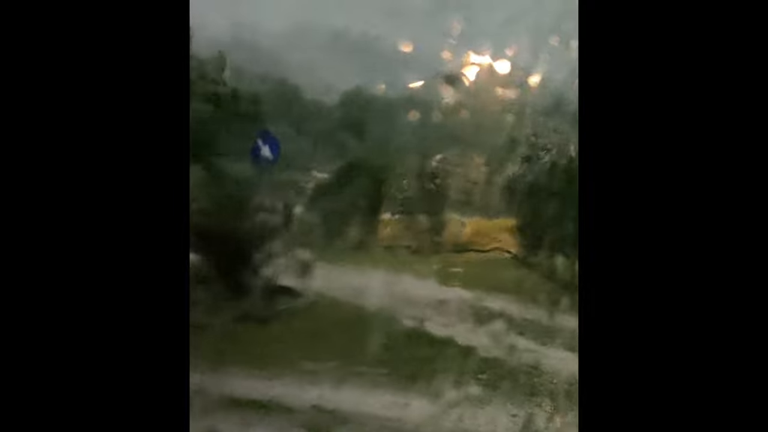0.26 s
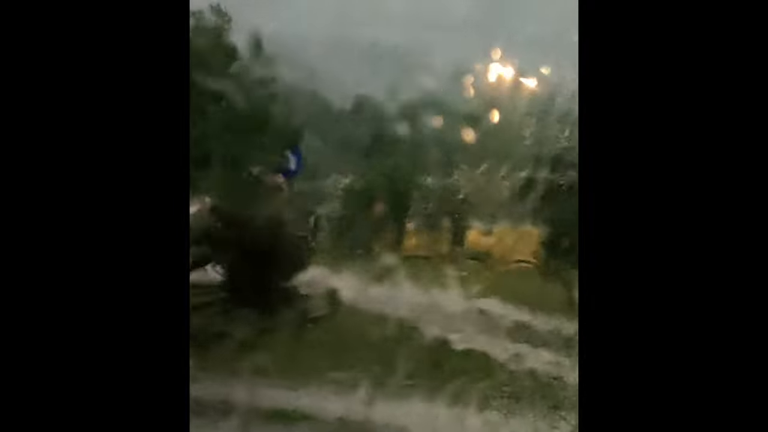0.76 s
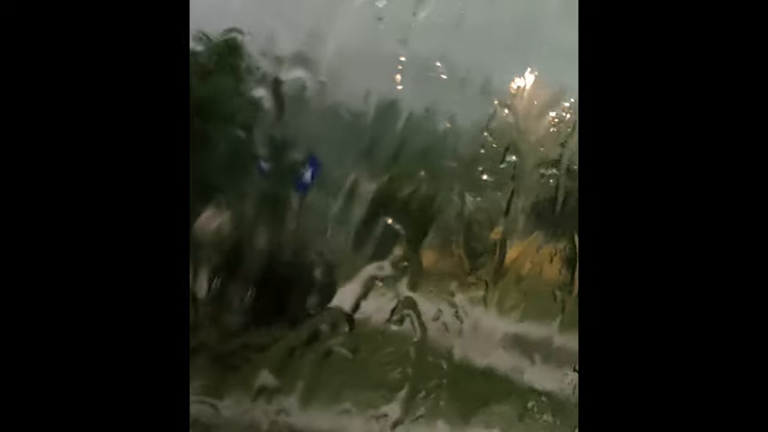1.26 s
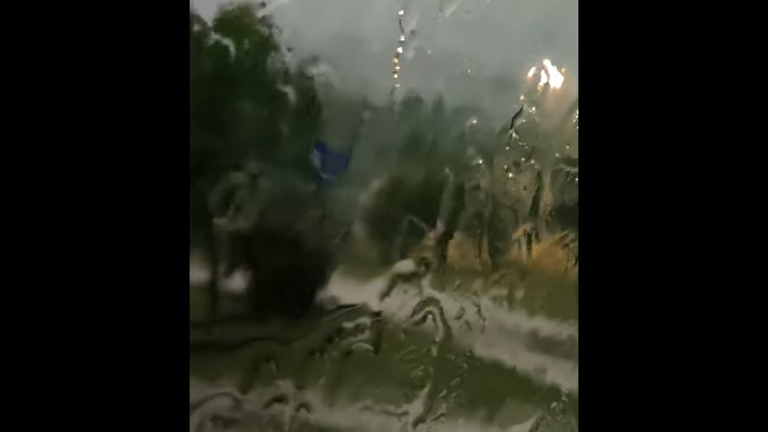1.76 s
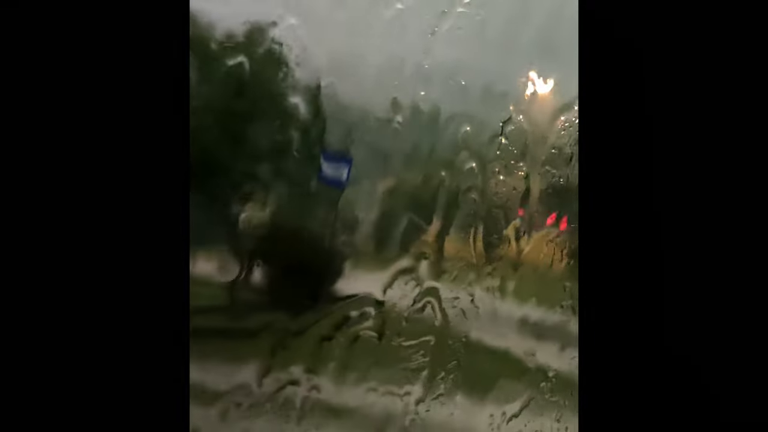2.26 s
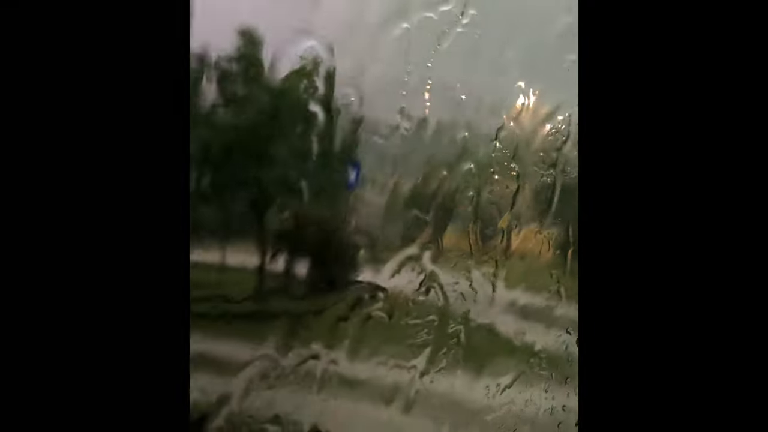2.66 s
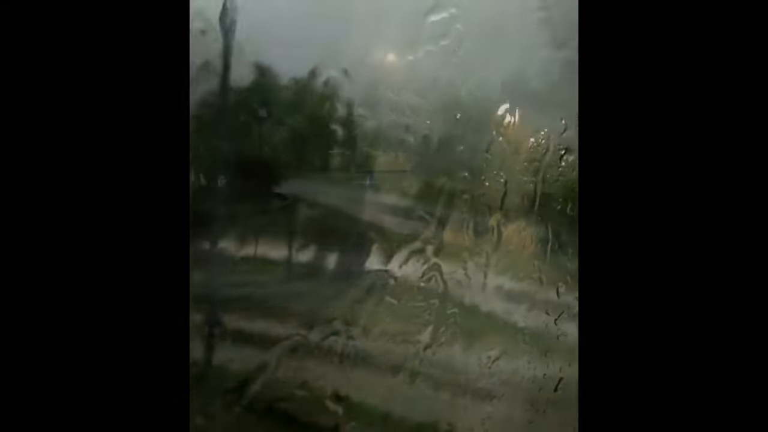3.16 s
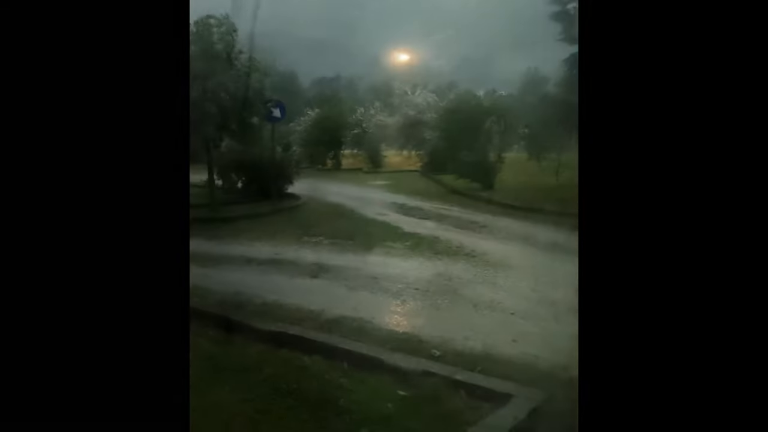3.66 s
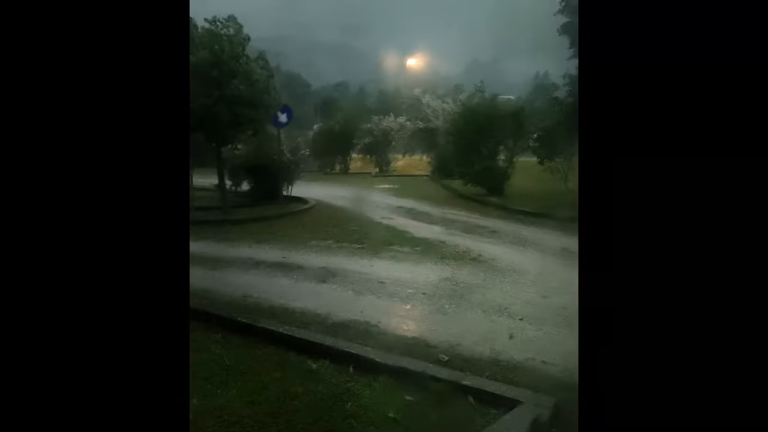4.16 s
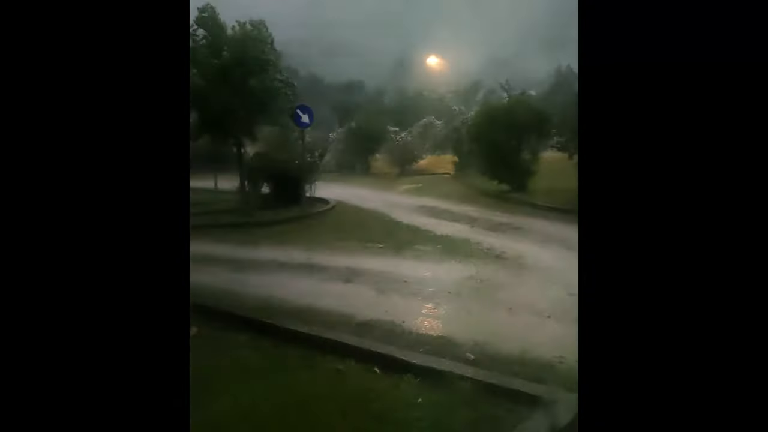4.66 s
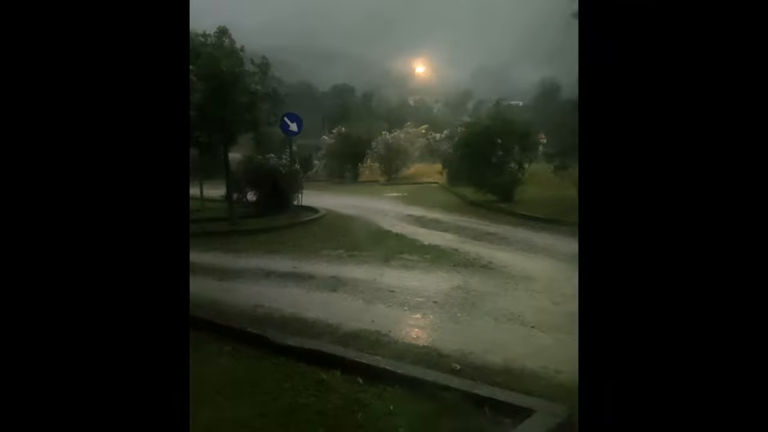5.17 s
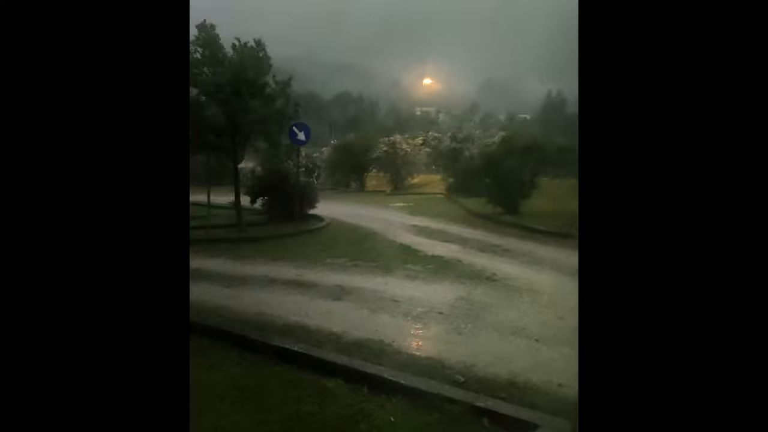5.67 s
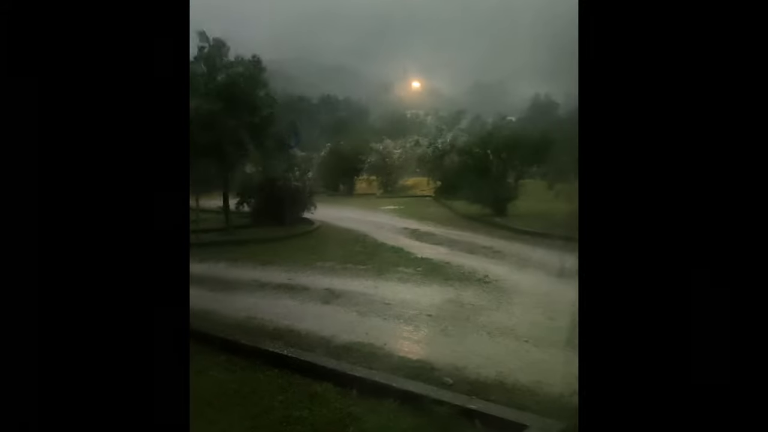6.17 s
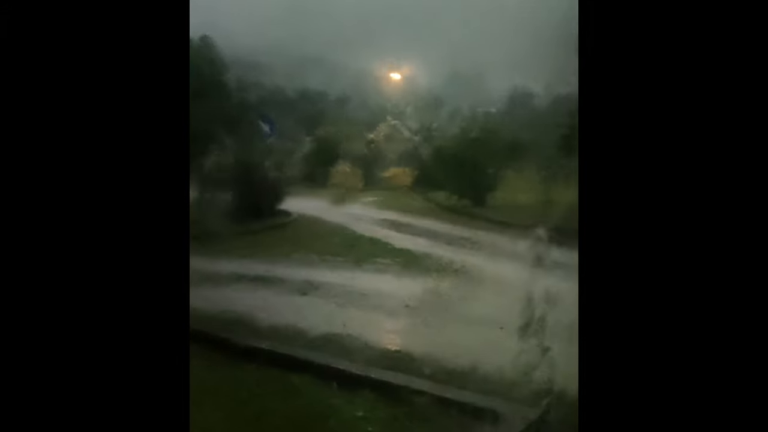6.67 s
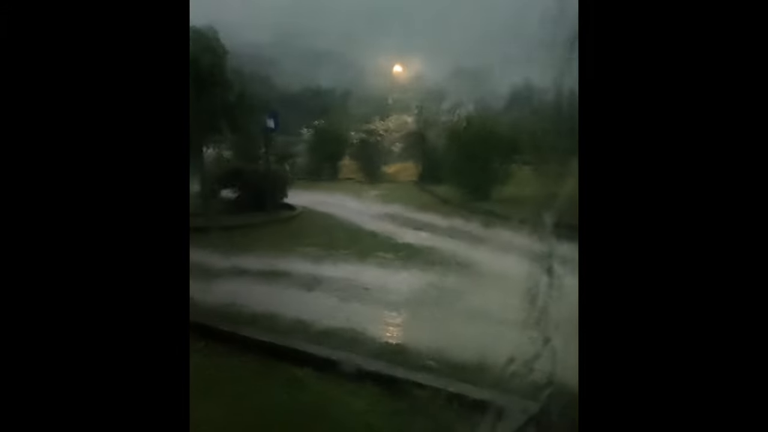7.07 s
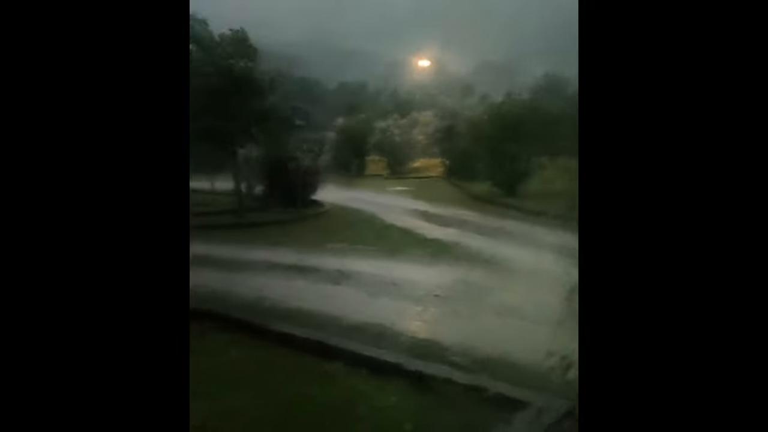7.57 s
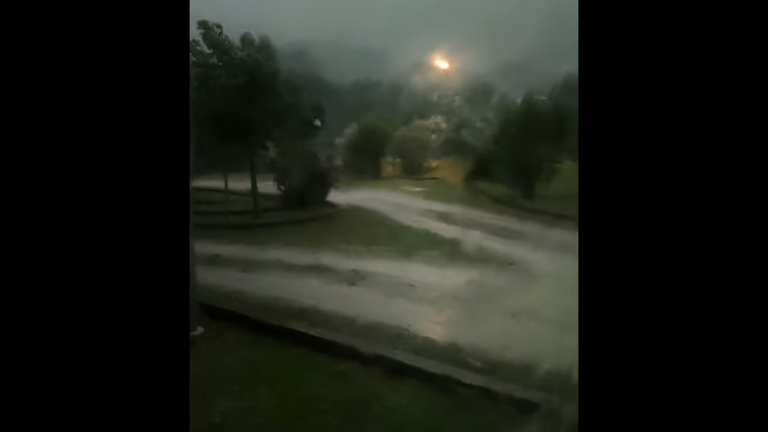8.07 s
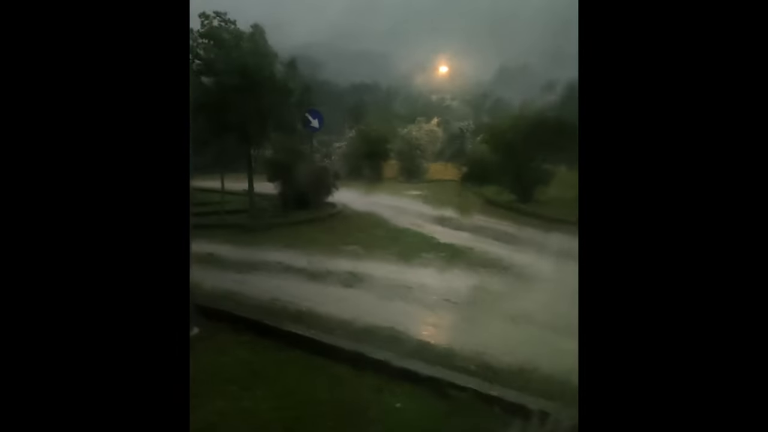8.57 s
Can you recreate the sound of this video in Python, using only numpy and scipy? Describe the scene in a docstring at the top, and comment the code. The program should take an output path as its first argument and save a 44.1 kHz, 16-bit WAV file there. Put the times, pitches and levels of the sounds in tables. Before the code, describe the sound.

Close rain patter and spray on a window with low roof thumps and wind rumble, a momentary silence, a quieter stretch, then violent splashing bursts.

```python
"""Heavy rain inside a closed shelter

Gusts of rain beat on the glass and roof, heard from inside by a microphone with two close ports.
Behind a steady wash from outside, wind noise buffets the walls and clumped impacts drum low on the roof;
thumps ring the air and panels. Nearest the ear, drops patter, spray and fizz on the pane, as filtered ticks
and rustle, and big splats ring it. The sound cuts out for a moment and fades back in."""
import sys
import numpy as np
from scipy import signal
from scipy.fft import rfft, irfft, next_fast_len
from scipy.io import wavfile
from scipy.ndimage import uniform_filter1d

SR = 44100
rng = np.random.default_rng(int(sys.argv[2]) if len(sys.argv) > 2 else 0)


def pcm_store(signal):
    """Save signal as 16-bit PCM."""
    levels = np.round(np.clip(np.atleast_2d(signal), -1, 1) * 32767)
    wavfile.write(sys.argv[1], SR, levels.astype(np.int16).T)


N = 388521  # length in samples


def gain_of(db):
    """Decibels to amplitude gain."""
    return 10 ** (np.asarray(db) / 20)


def sides(db):
    """A left-right difference in dB, shared equally as gains of the two ports."""
    return gain_of(np.multiply(db, [[.5], [-.5]]))


def evened(x):
    """Scaled to an rms of 1."""
    return x / np.sqrt(np.mean(x ** 2) + 1e-20)


def over_time(points):
    """A table of times and values, joined by straight lines."""
    return np.interp(np.arange(N) / SR, *np.transpose(points))


def over_pitch(points, hz):
    """A table read on a log-frequency axis."""
    f, value = np.transpose(points)
    return np.interp(np.log(hz + 1), np.log(f + 1), value)


def smoothed(x, width, axis=-1):
    """Two running means in a row."""
    return uniform_filter1d(uniform_filter1d(x, width, axis), width, axis)


def uneven(db, per_s):
    """A random wander of the level, in dB."""
    return db * evened(smoothed(rng.standard_normal(N), int(SR / per_s / 2)))


def convolved(x, taps):
    """Both ports through one impulse response."""
    return signal.oaconvolve(x, taps[None], axes=1)[:, :N]


def coloured(x, spectrum):
    """Causal filter of unit energy: its phase is the Hilbert transform of the log gain."""
    hz = abs(np.fft.fftfreq(8192, 1 / SR))
    log_gain = np.log(gain_of(np.maximum(over_pitch(spectrum, hz), -100)))
    taps = np.fft.ifft(np.exp(np.conj(signal.hilbert(log_gain)))).real[:4096]
    return convolved(x, taps / np.linalg.norm(taps))


def drops(per_s, spread_db, t60, clump_db, clump_s, tick, count=1):
    """Random impacts, in clumps: a sharp tick, then a dying rustle unlike at the two ports."""
    hit = rng.random(N) < per_s / SR
    size = np.minimum(rng.exponential(1, N), 5)
    clump = evened(smoothed(rng.standard_normal(N), max(int(clump_s * SR), 1)))
    train = hit * gain_of(spread_db * size + clump_db * clump)
    decay = gain_of(-120 / (t60 * SR))  # power kept from sample to sample
    envelope = np.sqrt(signal.lfilter([1], [1, -decay], train ** 2))
    # each of the count parts that a drop excites moves in its own way under the same envelope
    ticks = evened(train) * rng.choice([-1., 1.], (count, 2, N))
    rustle = evened(envelope) * rng.standard_normal((count, 2, N))
    return evened(rustle + tick * ticks)


DECAY_DB_PER_DB = -0.1248  # dB of decay time per dB of blow above -30: bigger blows die sooner


def bursts(rows, rise_s, t60, pan_db, tick):
    """Blows, one signal per dB column: a first contact, then a rustle that rises and dies, on a random side."""
    t = np.arange(SR // 2) / SR
    envelope, contact = np.zeros((2, len(rows[0]) - 1, 2, N + SR))
    for (s, *db), side in zip(rows, rng.standard_normal((len(rows), 1))):
        at = round(s * SR)
        size = gain_of(db)[:, None, None] * sides(pan_db * side)
        decay_s = np.reshape(t60 * gain_of(DECAY_DB_PER_DB * (np.array(db) + 30)), (-1, 1, 1))
        envelope[:, :, at:at + len(t)] += size * (1 - np.exp(-t / rise_s)) * gain_of(-60 * t / decay_s)
        contact[:, :, at:at + 1] += tick * size
    return (envelope * rng.standard_normal(envelope.shape) + contact)[:, :, :N]


# likeness of the two microphone ports: pitch_hz, likeness (0 to 1)
SAME = [(60, 0.97), (200, 0.94), (350, 0.7), (500, 0.59), (750, 0.051), (1250, 0.49), (1700, 0.24),
        (2200, 0.16), (3200, 0.03), (6000, 0.24), (15000, .05)]
# balance of the two ports: pitch_hz, left_right_db
TILT = [(60, -1), (130, 0.5), (290, -1), (640, 1), (1410, 1), (3100, 1.5), (6820, -0.5), (15000, 2.5)]


def ports(x, lag_s):
    """Close microphone ports hear long waves alike, the right one a little late."""
    size = next_fast_len(N)
    hz = np.fft.rfftfreq(size, 1 / SR)
    left, right = rfft(x, size)
    same, tilt = np.clip(over_pitch(SAME, hz), 0, 1), gain_of(over_pitch(TILT, hz) / 2)
    shared = same * left * np.exp(-2j * np.pi * hz * lag_s)
    own = np.sqrt(1 - same ** 2) * right
    return irfft(np.array([left * tilt, (shared + own) / tilt]), size)[:, :N]


# colour of the steady rain outside, through the glass: pitch_hz, relative_level_db (per Hz)
WASH = [(300, -20), (500, 8), (700, -2.5), (1100, 3), (1500, -23), (2300, -7), (2900, 2), (3280, 7.5),
        (3600, 0), (4100, 0), (5000, -11.5), (6200, -8.5), (7200, -33), (8200, -36.5), (12000, -62)]


def far_wash():
    """Countless drops outside the shelter merge into steady noise, heard through the glass."""
    return coloured(rng.standard_normal((2, N)) * gain_of(-52), WASH)


BUFFET_DB, BUFFETS_PER_S = 2.5, 26  # unevenness of the wind and the deepest rumble
# level of the wind on the walls: start_s, level_db
WIND = [(0.0, -47), (0.04, -53), (0.2, -42.5), (0.23, -54), (1.26, -62), (1.5, -44.5), (1.59, -59),
        (2.81, -59), (2.85, -59), (3.08, -73), (3.11, -50), (3.25, -71), (3.3, -44.5), (3.8, -70),
        (3.96, -49), (4.1, -80), (4.21, -58), (4.88, -54.5), (5.3, -62), (5.33, -43), (5.62, -56),
        (5.63, -76), (5.79, -46.5), (6.05, -64), (6.58, -51), (6.69, -50), (6.86, -64), (6.93, -48),
        (7.77, -59), (8.81, -44.5)]
# colour of the wind on the walls: pitch_hz, relative_level_db (per Hz)
RUMBLE = [(40, -49), (70, -24), (95, -1.5), (125, 8), (160, 7), (250, -41), (500, -84)]


def wind_on_walls():
    """Wind buffets the shelter walls: low noise whose level wanders quickly."""
    level_db = over_time(WIND) + uneven(BUFFET_DB, BUFFETS_PER_S)
    return coloured(rng.standard_normal((2, N)) * gain_of(level_db), RUMBLE)


# level of the deepest rumble: start_s, level_db
LOWS = [(0.0, -48), (0.07, -70), (0.14, -49), (0.19, -64), (1.25, -67), (1.47, -50), (1.74, -64),
        (1.99, -60), (2.87, -71), (2.94, -92), (3.14, -65), (4.21, -69), (4.75, -64), (4.92, -65),
        (6.32, -75), (6.57, -69), (7.25, -63), (7.45, -52), (7.57, -76), (7.6, -70), (8.75, -62),
        (8.8, -56)]
# colour of the deepest rumble: pitch_hz, relative_level_db (per Hz)
DEEP = [(10, -25), (22, -15), (40, -7), (70, 0), (95, -2), (140, -54)]


def deepest_rumble():
    """Noise at the bottom of hearing swells and sinks under everything."""
    level_db = over_time(LOWS) + uneven(BUFFET_DB, BUFFETS_PER_S)
    return coloured(rng.standard_normal((2, N)) * gain_of(level_db), DEEP)


# level of the rain on the roof overhead: start_s, level_db
ROOF = [(0.0, -32), (0.09, -41), (0.17, -44), (0.25, -42.5), (0.86, -41), (1.16, -42), (1.49, -35.5),
        (1.54, -40.5), (2.06, -36.5), (2.15, -40.5), (2.27, -35), (2.48, -42.5), (2.54, -41.5), (2.76, -47),
        (2.85, -35), (2.99, -45), (3.08, -42.5), (3.32, -36), (3.77, -45.5), (3.8, -37.5), (3.83, -49),
        (3.91, -34.5), (4.05, -42), (4.64, -37), (4.71, -31.5), (4.85, -43.5), (4.98, -35), (5.1, -40),
        (5.17, -39.5), (5.28, -42), (5.36, -46.5), (5.68, -42), (5.92, -49), (5.97, -41.5), (6.17, -46.5),
        (6.27, -46), (6.29, -49), (6.43, -34.5), (6.53, -41.5), (6.65, -30.5), (6.85, -31.5), (6.89, -26.5),
        (7.1, -34), (7.21, -31.5), (7.34, -41.5), (7.53, -30), (7.6, -37), (8.73, -30.5), (8.81, -36)]
# low thumps on the roof: start_s, level_db
THUMPS = [(0.137, -25), (0.168, -24.5), (0.718, -28.5), (1.477, -28.5), (2.271, -26.5), (2.303, -35),
          (2.56, -33), (2.818, -38), (3.022, -35), (3.105, -31), (3.3, -36), (3.571, -44), (3.912, -40),
          (4.376, -33.5), (4.539, -33), (4.655, -42), (4.687, -28), (4.713, -28), (4.741, -43),
          (5.055, -27), (5.362, -41), (5.438, -28), (5.492, -45), (5.589, -33.5), (5.653, -29),
          (5.697, -38), (5.959, -43.5), (6.008, -39), (6.256, -32), (6.64, -21.5), (6.892, -19),
          (7.475, -27), (8.19, -24), (8.304, -24.5), (8.39, -23), (8.692, -25)]
# colour of the roof panels and shelter air: pitch_hz, relative_level_db (per Hz)
DRUM = [(59, -42.5), (100, -21), (165, -4.5), (197, 0.5), (220, -2), (244, 3), (290, -5.5), (338, -4.5),
        (392, -14.5), (425, -7), (458, -23), (500, -13), (650, -16.5), (1100, -120)]


def roof_drum():
    """Clumped drops and slow-rising thumps shake the roof panels, which pass only low sound on."""
    roof, = drops(per_s=4300, spread_db=3.5, t60=0.015, clump_db=0.94, clump_s=0.051, tick=0.17)
    level_db = over_time(ROOF) + uneven(db=-0.5, per_s=26)
    thumps = bursts(THUMPS, rise_s=0.034, t60=0.18, pan_db=0, tick=5.2)[0]
    return coloured(roof * gain_of(level_db) + thumps, DRUM)


BOOM_DB, BOOM_SPREAD_DB = -7.5, 4  # ring against the thump's level, and its chance spread
HUM_DB = -50.5  # steady hum, before each mode's own level
# low modes of the shelter air and roof panels: pitch_hz, level_db, t60_s
BOOM = [(195, -9, 0.26), (219.7, -6, 0.37), (248.7, -4.5, 0.21), (345.4, -5.5, 0.18), (722, -13, .06)]


def boom():
    """Thumps ring the low modes, each blow exciting them unevenly; scattered drops keep them humming."""
    t, out = np.arange(SR // 3) / SR, np.zeros(N)
    share = rng.standard_normal((len(THUMPS), len(BOOM)))
    for (hz, db, t60), part in zip(BOOM, share.T):
        rise = 1 - np.exp(-t * hz)
        ring = gain_of(db - 60 * t / t60) * rise * np.sin(2 * np.pi * hz * t)
        blows = np.zeros(N)
        for (s, level_db), p in zip(THUMPS, part):
            blows[round(s * SR)] = gain_of(level_db + BOOM_DB + BOOM_SPREAD_DB * p)
        hum = evened(signal.oaconvolve(rng.standard_normal(N), ring)[:N]) * gain_of(HUM_DB + db)
        out += signal.oaconvolve(blows, ring)[:N] + hum
    return np.array([out, out])


FLURRY_DB, PATTER_FLURRY_DB, FLURRIES_PER_S = 1, 0.55, 14.5  # the heavy pane evens the flurries out
# rain driven against the pane: start_s, spray_db, patter_above_spray_db, fizz_above_spray_db
RAIN = [(0, -43.5, 11, -12), (.05, -37.5, 4.5, -28), (.13, -45, 5.5, -22), (.27, -51, 2.5, -21),
        (.46, -51.5, 1, -19), (.58, -41, 5.5, -19), (.85, -41, 5.5, -24), (1.0, -46.5, 4.5, -23),
        (1.3, -48.5, 8, -21), (1.43, -44, 6.5, -25), (1.51, -32.5, -2.5, -24), (1.55, -34, 3, -22),
        (1.63, -40.5, 4, -24), (1.67, -35, -0.5, -25), (1.72, -38.5, 4.5, -20), (1.81, -43.5, 5.5, -23),
        (1.93, -37.5, 4.5, -27), (2.1, -41.5, 5, -23), (2.17, -47.5, 5, -23), (2.28, -47.5, 2.5, -20),
        (2.44, -50.5, 4.5, -22), (2.54, -43.5, 4, -25), (2.64, -51.5, 3, -20), (2.86, -54, 4, -18),
        (2.93, -54, 16, -20), (2.97, -54, 14, -20), (3.015, -56, 12, -20), (3.04, -49, 10, -22),
        (3.1, -45.5, 9.5, -25), (3.19, -45, 8.5, -23), (3.25, -37.5, 8.5, -24), (3.32, -37, 8.5, -21),
        (3.36, -42, 6, -24), (3.4, -42, 6.5, -23), (3.53, -46, 9, -28), (3.73, -50, 5.5, -21),
        (4.0, -43, 8.5, -24), (4.27, -46.5, 7, -21), (4.5, -48.5, 9.5, -26), (4.54, -46, 6.5, -24),
        (4.6, -40, 8.5, -28), (4.64, -36.5, 8, -26), (4.69, -40, 5.5, -26), (4.77, -45, 8, -24),
        (4.8, -40.5, 6.5, -30), (4.84, -44, 7.5, -31), (4.9, -42, 7.5, -25), (4.95, -42, 8.5, -31),
        (4.99, -45.5, 9, -26), (5.06, -48, 10.5, -24), (5.16, -52.5, 5, -26), (5.4, -55.5, 5.5, -23),
        (5.48, -54, 4, -22), (5.56, -53.5, 2, -23), (5.65, -52, 9, -31), (5.75, -53, 5.5, -26),
        (6.2, -52, 0, -26), (6.3, -48.5, 7.5, -28), (6.52, -42, 8, -25), (6.621, -24, 0, -30),
        (6.68, -26.5, 2, -22), (6.78, -30, 2.5, -28), (6.85, -25, -3, -27), (6.91, -22, -0.5, -26),
        (6.96, -23.5, -1, -26), (7.02, -20.5, -1, -27), (7.07, -31.5, 2.5, -24), (7.11, -31, 2.5, -29),
        (7.22, -32, 2.5, -26), (7.3, -34, 2.5, -31), (7.39, -36.5, 2.5, -27), (7.45, -34.5, 3.5, -27),
        (7.5, -34, 3, -24), (7.57, -34.5, 9, -27), (7.62, -33, 3, -29), (7.69, -36.5, 6, -26),
        (7.73, -34.5, 4.5, -25), (7.8, -34.5, 3.5, -25), (7.92, -39, 7, -27), (7.99, -40.5, 8.5, -23),
        (8.06, -33, 2, -31), (8.15, -30.5, 6.5, -26), (8.23, -31.5, 4.5, -31), (8.27, -32.5, 6, -31),
        (8.34, -31, 1, -22), (8.38, -32, 4.5, -26), (8.5, -27.5, 1.5, -27), (8.66, -24.5, -1, -24),
        (8.81, -30.5, 2.5, -26)]


def rain_levels():
    """Gusts set the levels of patter, spray and fizz in dB, each roughened by flurries."""
    s, spray_db, patter_above_db, fizz_above_db = np.transpose(RAIN)
    t = np.arange(N) / SR
    patter = np.interp(t, s, spray_db + patter_above_db) + uneven(PATTER_FLURRY_DB, FLURRIES_PER_S)
    spray = np.interp(t, s, spray_db) + uneven(FLURRY_DB, FLURRIES_PER_S)
    fizz = spray + np.interp(t, s, fizz_above_db) + uneven(FLURRY_DB, FLURRIES_PER_S)
    return patter, spray, fizz


SPATTER_DB, SPATTER_PER_S, SPATTER_SPREAD_DB = -12.5, 1200, 2.5  # level against the spray's drops


def spatter(low_hz=1220, high_hz=6450, cycles=4, count=16):
    """Single drops, each a few cycles at its own pitch, nearer one port or the other."""
    hit = rng.random((2, N)) < SPATTER_PER_S / SR
    size = hit * gain_of(SPATTER_SPREAD_DB * np.minimum(rng.exponential(1, (2, N)), 5))
    kind = rng.integers(0, count, (2, N))
    t, out = np.arange(512) / SR, np.zeros((2, N))
    for k, hz in enumerate(np.geomspace(low_hz, high_hz, count)):
        grain = t * np.exp(-2 * np.pi * t * hz / cycles) * np.sin(2 * np.pi * hz * t)
        out += convolved(size * (kind == k), grain / np.linalg.norm(grain))
    return evened(out + 0.068 * out[::-1])  # a little reaches the other port


SPLAT_RISE_S = 0.0037
# decay of a splat of -30 dB, in the order spray, patter, fizz: t60_s
SPLAT_T60 = [0.063, 0.091, 0.061]
# big drops bursting on the pane: start_s, spray_db, patter_db, fizz_db
SPLATS = [(0.1358, -22, -17, -39), (0.146, -25, -28, -50), (0.163, -35, -28, -57), (0.302, -43, -43, -49),
          (0.3325, -34, -35, -58), (0.508, -34, -30.5, -45), (1.201, -46, -33, -69),
          (1.4516, -42.5, -41, -61), (1.4876, -28, -38, -55), (1.5134, -20, -27, -49),
          (1.579, -20.5, -29, -59), (1.6871, -24, -24, -46), (1.844, -33, -41, -55), (1.906, -26, -27, -66),
          (2.044, -47, -36, -48), (2.2164, -26, -31, -56), (2.2538, -30, -39, -66), (2.2987, -39, -45, -63),
          (3.083, -45, -34, -70), (3.2104, -32, -31, -47), (3.2816, -37, -26, -46),
          (3.33, -21.5, -28.5, -44), (3.5114, -30, -30.5, -63), (4.4862, -36, -33, -72),
          (4.592, -35, -30, -72), (4.6356, -21.5, -23, -45), (4.647, -22, -37, -52), (4.709, -24, -50, -48),
          (5.0075, -28.5, -32, -47), (5.123, -40.5, -40, -76), (5.2194, -40, -53, -66),
          (5.4385, -44, -35, -70), (5.466, -55, -40, -75), (5.495, -55, -43, -75),
          (5.5934, -39, -34.5, -70), (5.611, -46, -37.5, -75), (5.6594, -52, -36, -78),
          (5.7, -54, -42, -78), (6.2986, -41, -48, -58), (6.348, -32.5, -28.5, -59),
          (6.536, -24.5, -46, -61), (6.5854, -35, -32, -39), (6.702, -14, -28, -48),
          (6.776, -15, -18.5, -50), (6.816, -12.5, -27, -39), (6.8434, -27, -20, -40),
          (6.875, -19, -30, -48), (7.1382, -14.5, -23.5, -38.5), (7.18, -17, -41, -48),
          (7.207, -16, -27, -51), (7.2424, -32, -44, -59), (7.2561, -16.5, -38, -51),
          (7.4093, -30, -33, -60), (7.4443, -19, -31, -64), (7.47, -17.5, -18.5, -58),
          (7.56, -23, -25, -55), (7.6108, -35, -23, -58), (7.725, -26, -42, -55), (7.82, -22.5, -46, -49),
          (7.9545, -29, -38, -60), (8.049, -41, -22.5, -63), (8.0775, -32, -26.5, -62),
          (8.2034, -33, -23.5, -45), (8.365, -24, -22, -55), (8.5873, -20, -29, -45),
          (8.627, -26, -33, -46), (8.668, -8, -25, -39), (8.71, -10.5, -27, -55), (8.744, -14, -21, -38)]


def splats():
    """Big drops burst on the pane: a hard contact, then spray, patter and fizz that die in their own times."""
    return bursts(SPLATS, SPLAT_RISE_S, SPLAT_T60, pan_db=1, tick=2.4)


# rings that a splat wakes in the pane: pitch_hz, level_db (against its patter, above 1.4 kHz its spray), t60_s
KNOCK = [(348, -10.5, .1), (720, -10, .06), (898, -12, .09), (1560, -23, .05), (2356, -22, .05),
         (3020, -24, .05)]


def knocks():
    """Each splat also rings the pane briefly, every ring by its own chance amount."""
    t, out = np.arange(SR // 8) / SR, np.zeros((2, N))
    share = rng.standard_normal((len(SPLATS), len(KNOCK), 2))
    s, spray_db, patter_db, _ = np.transpose(SPLATS)
    at = np.round(s * SR).astype(int)
    for k, (hz, db, t60) in enumerate(KNOCK):
        rise = 1 - np.exp(-t / SPLAT_RISE_S)
        ring = gain_of(db - 60 * t / t60) * rise * np.sin(2 * np.pi * hz * t)
        blows = np.zeros((2, N))
        blows[:, at] = gain_of(patter_db if hz < 1400 else spray_db) * share[:, k].T
        out += convolved(blows, ring)
    return out


PATCH_DB, PATCH_S, PATCH_HZ = 1.22, 0.03, 600


def patchy(x):
    """Short stretches of the spectrum swell and sink at random."""
    z = signal.stft(x, nperseg=256, noverlap=192)[2]
    bins, frames = max(int(PATCH_HZ * 256 / SR), 1), max(int(PATCH_S * SR / 64), 1)
    field = smoothed(rng.standard_normal(z.shape[:0:-1]), frames, axis=0)
    field = evened(smoothed(field, bins, axis=1))
    return signal.istft(z * gain_of(PATCH_DB * field.T), nperseg=256, noverlap=192)[1][:, :N]


# narrow rings of the pane and its frame: pitch_hz, width_hz, level_db (above the surroundings)
RINGS = [(757, 39, -1.5), (887, 20, 4.5), (1083, 18, 3), (1604, 29, 4), (2040, 36, 2.5), (2436, 39, 4.5),
         (2940, 20, 6), (3650, 28, 2.5), (3955, 28, 2), (4620, 33, -3.5), (5060, 47, -3.5), (5770, 46, 6)]


def rung(x):
    """The pane lifts or lowers the sound around each of its rings."""
    hz = np.arange(0, SR / 2, 10.)
    lift_db = sum(db / (1 + (2 * (hz - f) / width) ** 2) for f, width, db in RINGS)
    return coloured(x, np.transpose([hz, lift_db]))


LEAN_DB_PER_DB = -0.0842  # left-right dB per dB of spray above -50: harder rain has its treble further right
# bending of the pane: pitch_hz, relative_level_db (per Hz)
PATTER = [(200, -31), (320, -11.5), (500, -6.5), (700, -7), (900, -8), (1200, -8), (1600, -16.5),
          (2200, -18), (3500, -55.5)]
# colour of a hollow note in the patter: pitch_hz, relative_level_db (per Hz)
HOLLOW = [(350, -49), (580, -9.5), (700, 5.5), (800, 3), (950, -6.5), (1500, -51.5)]
# the hollow note comes and goes: start_s, level_db (against the patter)
HOLLOW_DB = [(0, -17), (0.15, -10), (0.5, -11), (1.5, -18), (2.8, -6), (3.25, -6), (4.0, -8), (4.6, -10),
             (5.0, -9), (5.6, -5), (6.2, -19), (7.0, -9.5), (7.6, -12.5), (8.15, -8), (8.81, -11)]
# drops breaking up: pitch_hz, relative_level_db (per Hz)
SPRAY = [(700, -46.5), (1200, 0.5), (1600, 3), (1900, -3.5), (2100, 0.5), (2620, 3), (3300, 4), (4000, 2.5),
         (5050, -4), (6310, -6), (7250, -15), (8200, -35), (9500, -60), (11000, -100)]
# finest droplets: pitch_hz, relative_level_db (per Hz)
FIZZ = [(6500, -43), (8000, 6.5), (8270, -6), (8720, 6), (10200, 6.5), (13700, 1), (14900, -3),
        (15300, -31), (15700, -59)]


def rain_on_pane():
    """Drops bend the pane (patter and hollow note) and break up on it (spray and fizz)."""
    patter_db, spray_db, fizz_db = rain_levels()
    pane, splash, note = drops(per_s=1500, spread_db=0.0, t60=0.061, clump_db=0.37, clump_s=0.0031,
                               tick=0.46, count=3)
    mist, = drops(per_s=1300, spread_db=-2.0, t60=0.05, clump_db=0.5, clump_s=0.032, tick=.3)
    splat_spray, splat_patter, splat_fizz = splats()
    lean = sides(LEAN_DB_PER_DB * (spray_db + 50))
    patter = coloured(pane * gain_of(patter_db) + splat_patter, PATTER)
    hollow = note * gain_of(patter_db) + splat_patter[::-1]  # the splats with their ports swapped
    hollow = coloured(hollow * gain_of(over_time(HOLLOW_DB)), HOLLOW)
    spray = (splash + gain_of(SPATTER_DB) * spatter()) * gain_of(spray_db)
    spray = coloured(spray + splat_spray, SPRAY) * lean
    fizz = coloured(mist * gain_of(fizz_db) + splat_fizz, FIZZ) * lean ** 2
    return patchy(patter + hollow + spray + fizz)


# the gusts drive the rain to one side or the other: start_s, left_right_db
DRIFT = [(0.0, 2.5), (0.07, -2), (0.14, 0), (0.22, -1.5), (1.77, -1), (2.82, -2), (2.92, -1), (3.12, -1),
         (4.56, -0.5), (7.58, -1.5), (7.83, -0.5), (8.81, -1)]


def scene():
    """The shelter's shell and, nearer, its glass with the far wash, each at the two ports."""
    shell = deepest_rumble() + wind_on_walls() + roof_drum() + boom()
    glass = rung(far_wash() + rain_on_pane()) + knocks()
    return ports(shell, lag_s=0.00018) + ports(glass, lag_s=0.000383) * sides(over_time(DRIFT))


FADE_IN_S, FADE_CURVE = 0.19, 0.89  # the gain rises as this power of time
EDGE_HZ = 15692  # top of the band
# silence: start_s, end_s
DROPOUT = 2.867, 2.927


def record(dry):
    """The sound cuts out, fades back in, and a low-pass filter limits the band."""
    t = np.arange(N) / SR
    start, end = DROPOUT
    on = np.clip(np.maximum(start - t, t - end) / .002, 0, 1)  # 2 ms ramps beside the silence
    fade = np.where(t < start, 1, np.clip((t - end) / FADE_IN_S, .03, 1) ** FADE_CURVE)
    low_pass = signal.firwin(511, EDGE_HZ, window=("kaiser", 9), fs=SR)
    return signal.oaconvolve(dry * on * fade, low_pass[None], "same")


dry = scene()
out = record(dry)
pcm_store(out)
```